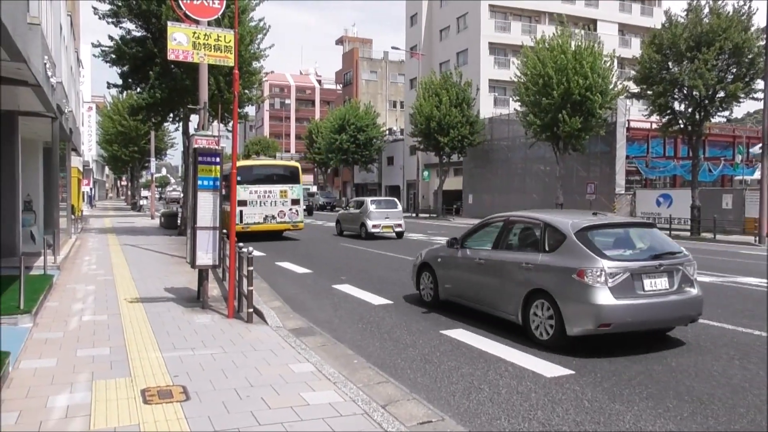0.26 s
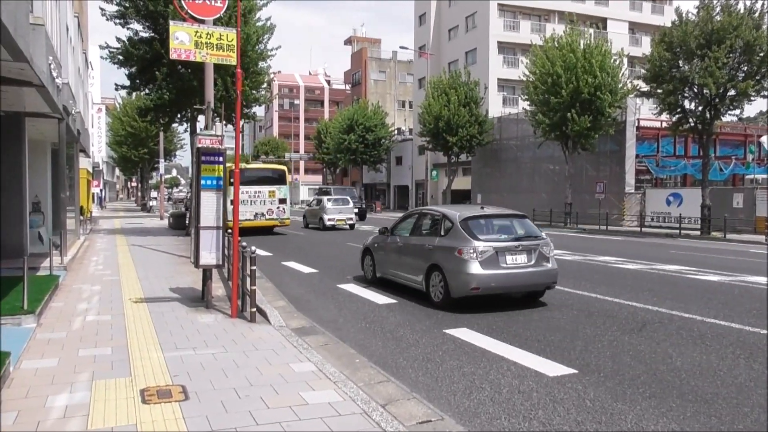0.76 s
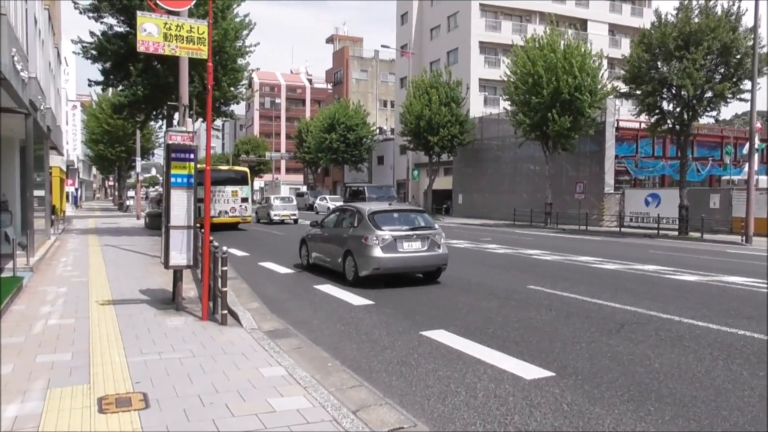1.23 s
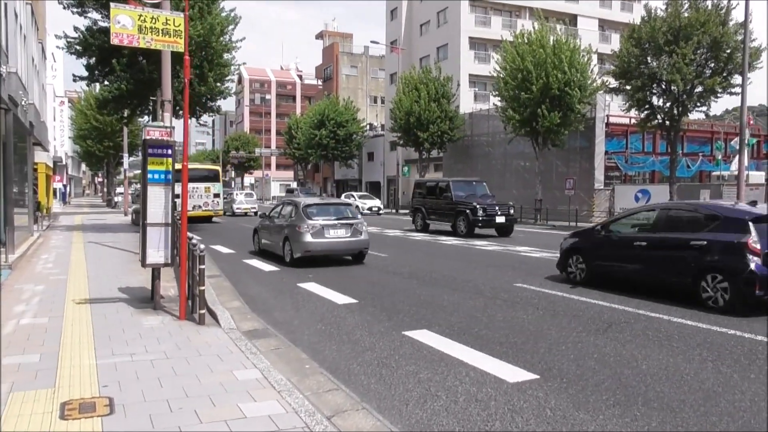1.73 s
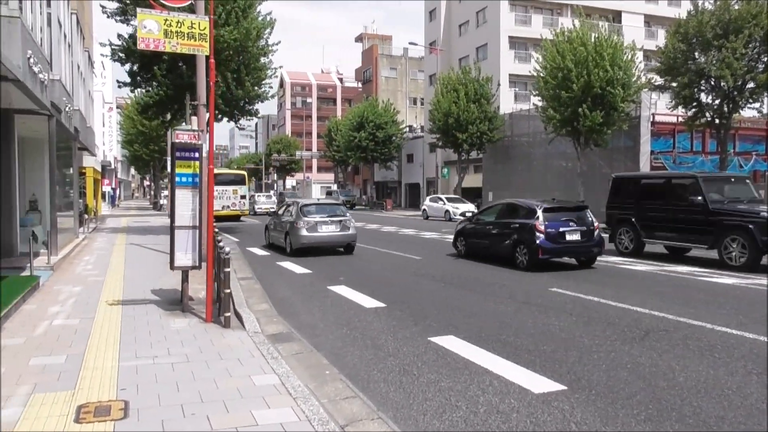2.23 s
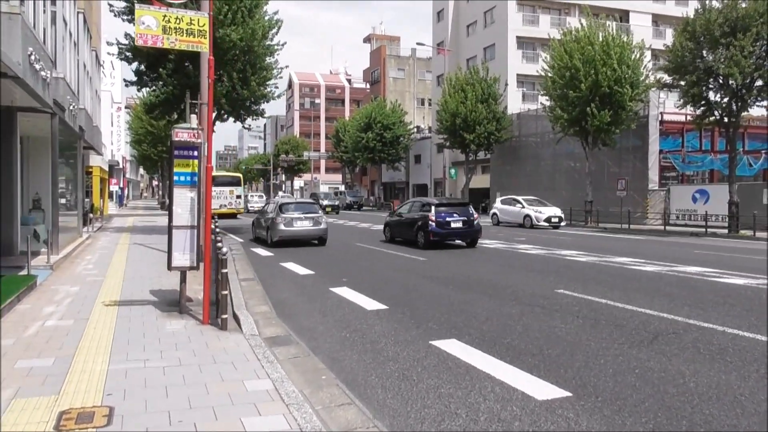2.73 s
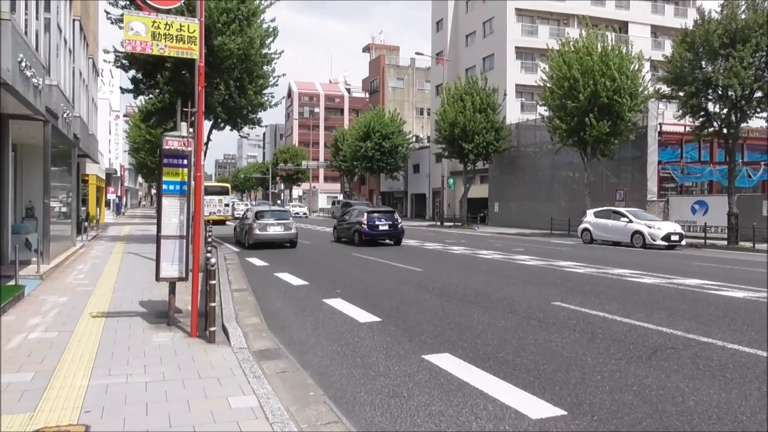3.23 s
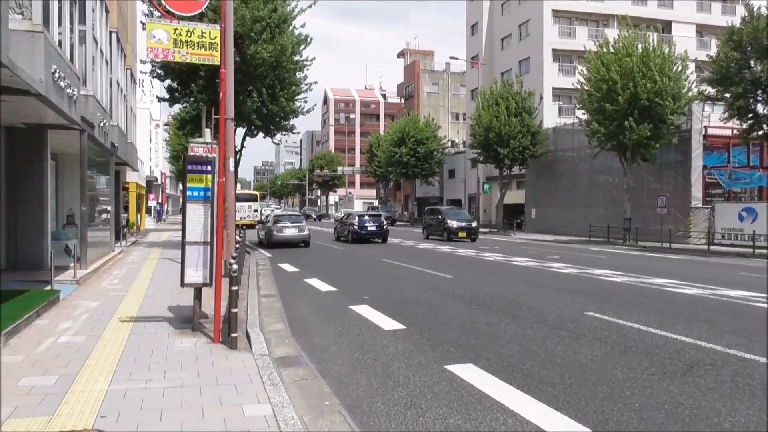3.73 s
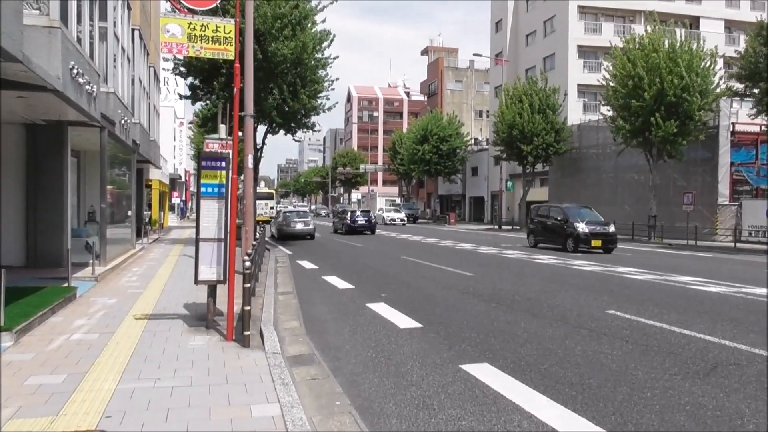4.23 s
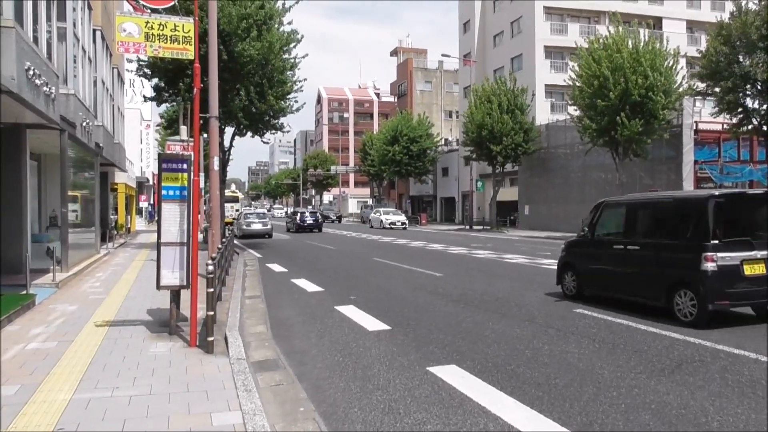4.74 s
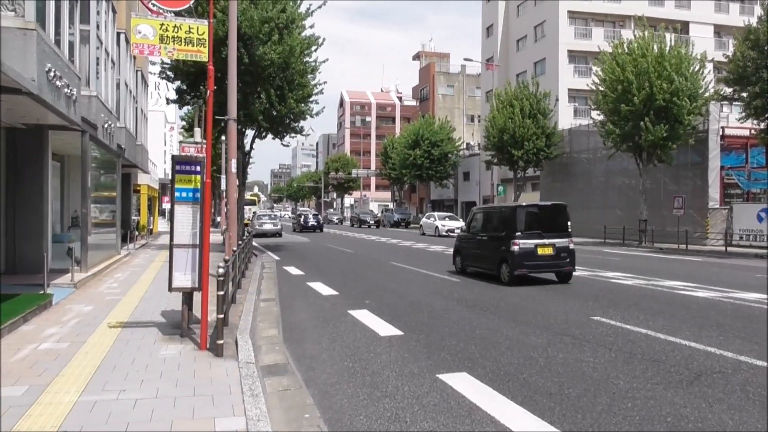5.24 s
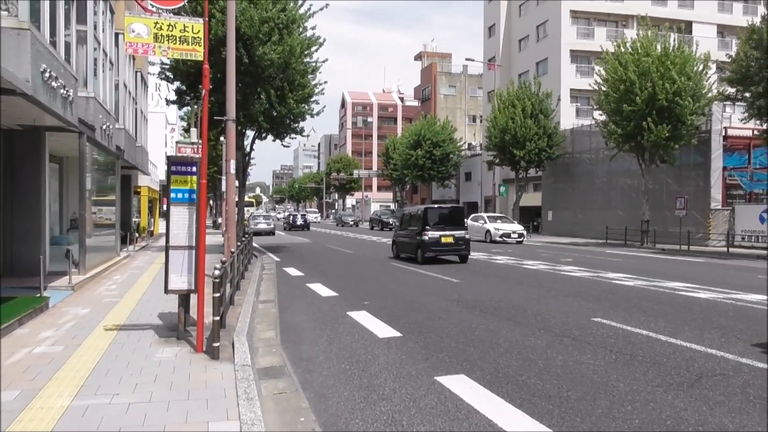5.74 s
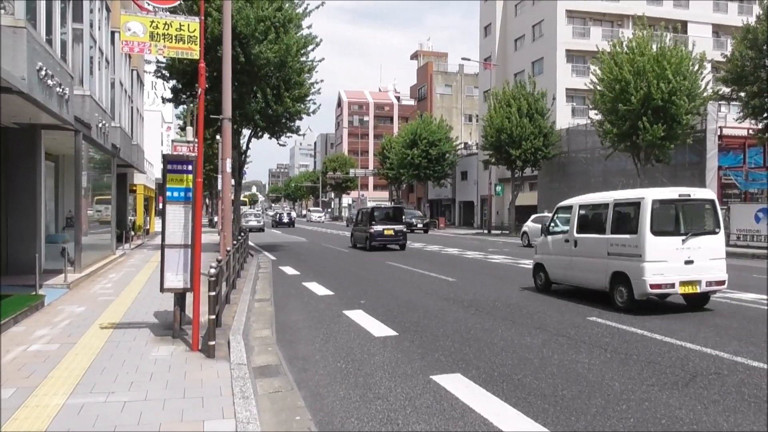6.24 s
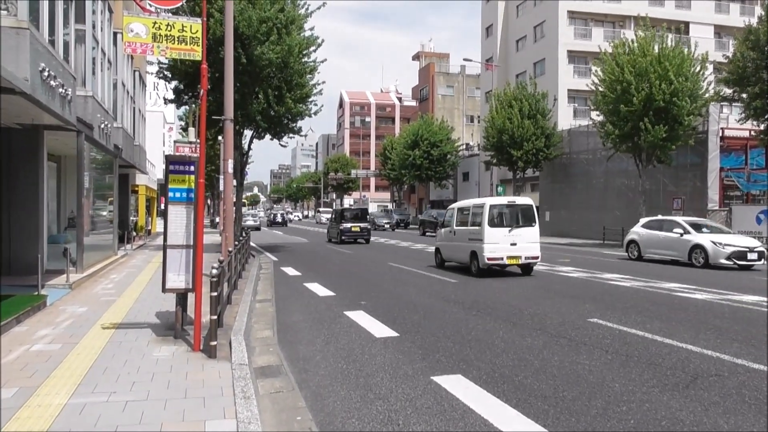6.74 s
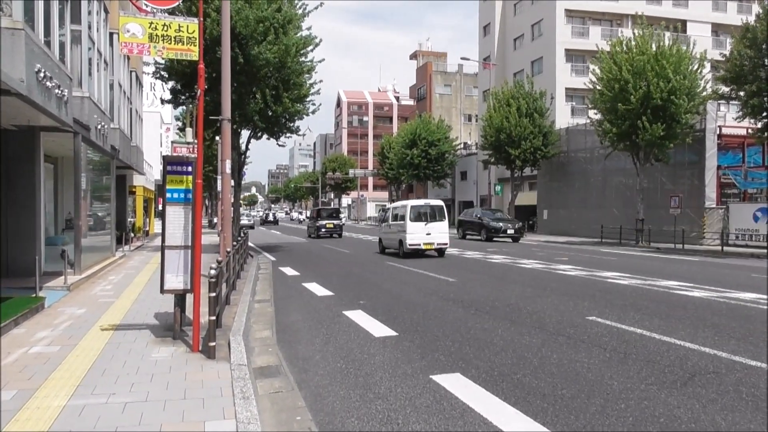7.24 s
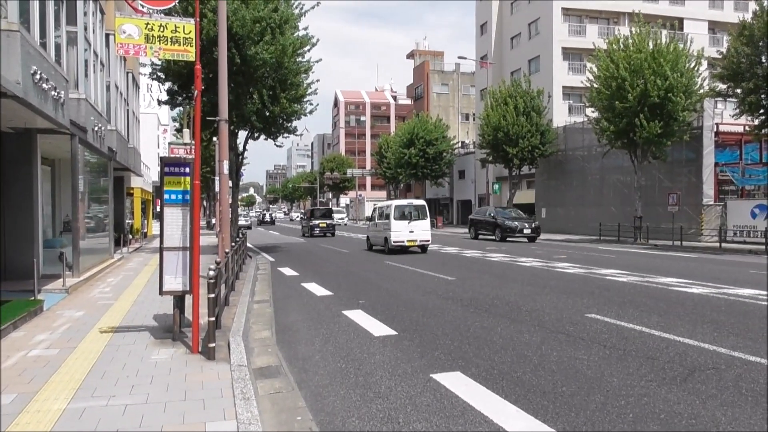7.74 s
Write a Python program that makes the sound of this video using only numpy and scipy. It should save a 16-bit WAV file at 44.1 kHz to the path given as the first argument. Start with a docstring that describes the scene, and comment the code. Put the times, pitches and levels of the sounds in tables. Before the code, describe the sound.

Steady city traffic rumbles as a bus engine pulls hard, shifts and pulls again, with passing tyre noise, small sharp ticks and an abrupt stop.

```python
"""On the pavement of a wide city street, a diesel bus pulls away from a stop.
Uneven firing pulses thud in its exhaust and chop the engine roar; the engine bay resonates as noise bands.
The turbocharger is a gliding whistle in a noisy halo. Cars and vans are swelling tyre noise and fine hiss,
among booms and breathy tones from narrow noise bands, over a rumble of shaped noise.
A few sharp ticks are short noise bursts; then the sound cuts off."""
import sys
import numpy as np
from scipy import signal
from scipy.fft import rfft, irfft
from scipy.io import wavfile
from scipy.ndimage import uniform_filter1d, minimum_filter1d

SR = 44100
rng = np.random.default_rng(int(sys.argv[2]) if len(sys.argv) > 2 else 0)


def inscribe(sig):
    """Save sig as 16-bit PCM at rate SR to the path in sys.argv[1].

    A 1-D sig is mono; a 2-D sig holds one channel per row.
    Samples are clipped to [-1, 1] before scaling.
    """
    pcm = np.round(np.clip(np.atleast_2d(sig).T, -1, 1) * 32767)
    wavfile.write(sys.argv[1], SR, pcm.astype(np.int16))


N = 351918
T = np.arange(N) / SR  # time of each sample, s
HZ = np.fft.rfftfreq(N, 1 / SR)  # frequency of each spectrum bin

# vehicles rolling by: peak_s, half_length_s, tread_db, groove_hz, rush_of_air_db, hiss_db,
# left_right_db (the tyres take only a share of it), hiss_brightness_db_per_octave
VEHICLES = [(0.15, 0.68, -25, 907, -30, -44, -1, 7.5), (1.103, 0.6, -25, 923, -33, -50.5, 3.5, 17),
            (1.85, 0.24, -27.5, 1102, -32.5, -47.5, 3.5, 7), (2.552, 0.74, -26, 1152, -30, -47, 0, -2),
            (4.021, 0.33, -24.5, 1195, -39, -58.5, -2.5, 0.5),
            (4.598, 0.4, -22, 1222, -33, -51.5, -1.5, 5.5),
            (5.085, 0.24, -23, 1294, -36.5, -54.5, -9.5, -11), (5.6, 0.56, -24, 1279, -32, -42, -9.5, -21),
            (6.142, 0.51, -23.5, 1410, -41.5, -38.5, -0.5, -3), (7.022, 0.67, -22.5, 947, -54, -46, 0, 4)]
# shape of the low rumble of traffic and exhaust: frequency_hz, relative_level_db
RUMBLE_SHAPE = [(15, -40.5), (25, -23.5), (42, -14), (70, -5.5), (105, -3.5), (160, 0), (225, 0),
                (295, 0.5), (380, -7.5), (600, -16), (1500, -63.5)]


def diesel(uneven=0.37, trim_db=-1.5, pulse_width=0.15):
    """Firing pulses, three to a crank turn and unequal, thud in the exhaust and chop the engine roar."""
    # firing of the bus engine: time_s, firings_per_s, exhaust_level_db
    firing = [(0, 93, -26.5), (1.2, 99, -37.5), (2.2, 94, -29.5), (3.2, 103, -26.5), (3.6, 92, -30.5),
              (4.3, 93, -26), (5.5, 95, -38.5), (7.4, 108, -31.5)]
    # the bus pulls, changes gear and pulls again: time_s, roar_level_db (before the trim)
    engine_load = [(0, -16), (0.8, -16), (1.8, -17.5), (3.25, -16), (3.5, -17.5), (3.7, -15.5), (4.62, -14),
                   (4.95, -16), (7.4, -15)]
    # shape of the engine roar: frequency_hz, relative_level_db
    roar_shape = [(200, -18.5), (330, -4.5), (420, -4.5), (560, -1), (740, 0), (860, -2), (1050, -19.5),
                  (1800, -16), (4000, -68)]

    rate, exhaust_db = curves(firing)
    load_db, = curves(engine_load)
    firings = np.cumsum(rate * (1 + 0.00834 * wander(5.93))) / SR  # count so far; the rate strays a little
    pulses = np.exp(-((firings % 1 - .5) / pulse_width) ** 2)
    # every third pulse is stronger than the other two
    pulses = pulses * (1 + 2 * uneven * np.cos(2 * np.pi * np.floor(firings) / 3))
    exhaust = street(colour(RUMBLE_SHAPE), pulses - pulses.mean()) * gain_of(exhaust_db)
    # shallow, because echoes from the house fronts fill in most of the chop
    chop = 1 - .14 * np.cos(2 * np.pi * firings)
    roar = street(colour(roar_shape)) * chop * gain_of(load_db + trim_db)
    return exhaust + roar


def engine_bay(side_db=1.5, growl_db=0.45):
    """Hollow resonances build up unevenly as the bus pulls hard and fall away at the gear change."""
    # resonances of the engine bay: pitch_hz, width_hz, level_db (at full pull)
    bay_resonances = [(447.7, 77, -23.5), (602, 70, -23), (701.5, 70, -23), (783, 60, -23.5)]
    full_pull_s, build_db_per_s = 1.76, 11.5
    shift_s, release_db_per_s = 3.31, 71

    build_db = -build_db_per_s * np.maximum(full_pull_s - T, 0)
    release_db = -release_db_per_s * np.maximum(T - shift_s, 0)
    ringing = both_sides(sum(hollow(hz, width) * gain_of(db) for hz, width, db in bay_resonances))
    return ringing * gain_of(build_db + release_db + growl_db * wander(12)) * panned(side_db)


def turbo(core_db=-5.0, halo_db=-1.5, flicker_db=1.5, halo_width_hz=100):
    """The blade tone follows the boost; turbulence and reflections smear a halo around it."""
    # strength of the whistle: time_s, level_db
    whistle = [(0.95, -67), (1.13, -55), (1.22, -41.5), (1.3, -47.5), (1.42, -46.5), (1.55, -53),
               (1.68, -49.5), (1.73, -46.5), (1.87, -47), (2.1, -44), (2.36, -44), (2.42, -50),
               (2.75, -52.5), (2.97, -58.5), (3.03, -43), (3.08, -54), (3.22, -69.5)]
    # the pitch is one arch: it spools up, tops out and runs down
    top_s, top_hz = 2.47, 8670
    spool_hz_per_s2, run_down_hz_per_s2 = 1070, 2050

    level_db, = curves(whistle)
    bend = np.where(T < top_s, spool_hz_per_s2, run_down_hz_per_s2)
    hz = np.maximum(top_hz - bend * (T - top_s) ** 2, top_hz / 2)
    shaky_hz = hz + 18 * wander(30)
    tone = np.exp(2j * np.pi * np.cumsum(shaky_hz) / SR)
    halo = tone * (wander(halo_width_hz) + 1j * wander(halo_width_hz))
    mixed = evened(tone.real) * gain_of(core_db) + evened(halo.real) * gain_of(halo_db)
    return mixed * gain_of(level_db + flicker_db * wander(12))


def tyres(patchy_db=.5, side_share=.35, far_side_db=0.0):
    """Treads drum on asphalt, grooves sing, air is squeezed out; the grain of the road shakes all three."""
    # shape of the tread roar: frequency_hz, relative_level_db
    tread_shape = [(400, -19), (750, -15), (950, 1.5), (1250, -1.5), (1600, -8.5), (2050, -16.5),
                   (2800, -32.5), (6000, -63.5)]
    # shape of the rush of air: frequency_hz, relative_level_db
    rush_shape = [(1000, -6), (1900, 1.5), (2550, 1), (3400, -3.5), (4200, -8.5), (4900, -16.5),
                  (6300, -20), (7700, -18.5), (9500, -24.5), (12000, -39), (15500, -54)]
    far_tread_db, far_rush_db = -24.5, -32.5  # steady tyres further down the street
    groove_db, groove_width_hz = -1.5, 150  # groove level is relative to the tread roar

    # add powers, so that all vehicles can share one noise for each kind of sound
    tread_power = (gain_of(far_tread_db) * panned(far_side_db)) ** 2
    rush_power = (gain_of(far_rush_db) * panned(far_side_db)) ** 2
    grooves = 0
    for s, half_s, tread_db, groove_hz, rush_db, _, side_db, _ in VEHICLES:
        nearness = swell(s, half_s)
        near = nearness * panned(side_share * side_db)
        tread_power = tread_power + (near * gain_of(tread_db)) ** 2
        rush_power = rush_power + (near * gain_of(rush_db)) ** 2
        song = hollow(groove_hz, groove_width_hz)
        grooves = grooves + song * nearness * gain_of(tread_db + groove_db)
    tread = street(colour(tread_shape)) * np.sqrt(tread_power)
    rush = street(colour(rush_shape)) * np.sqrt(rush_power)
    return (tread + both_sides(grooves) + rush) * gain_of(patchy_db * wander(23))


def passing(flutter_db=0.84):
    """Fine hiss carries only from vehicles close by, each with its own brightness."""
    # shape of the hiss before each vehicle's tilt: frequency_hz, relative_level_db
    hiss_shape = [(3000, -16), (4500, -11.5), (5400, -12.5), (6500, -4), (7400, 3.5), (8600, 1.5),
                  (9800, -4), (11500, -11.5), (13500, -26), (15500, -37.5)]

    octaves = np.log2(np.maximum(HZ, 4000) / 8000)  # above or below 8 kHz
    hiss = 0
    for s, half_s, _, _, _, db, side_db, tilt in VEHICLES:
        noise = street(colour(hiss_shape) * gain_of(tilt * octaves))
        hiss = hiss + noise * swell(s, half_s) * gain_of(db) * panned(side_db)
    return hiss * gain_of(flutter_db * wander(22))


def spray(s=5.7, half_s=0.62, flutter_db=2.2, doppler_hz_per_s=-60):
    """As two vans go by, air squeezed from their treads rings in fluttering bands that sink in pitch."""
    # broad bands in the vans' tyre noise: pitch_hz (at the peak of the pass), width_hz, level_db
    tyre_bands = [(3410, 250, -43.5), (4150, 200, -47), (5400, 300, -50.5)]

    sink_hz = doppler_hz_per_s * (T - s)
    bands = sum(hollow(hz + sink_hz, width) * gain_of(db + flutter_db * wander(9))
                for hz, width, db in tyre_bands)
    return both_sides(bands) * swell(s, half_s)


def rings():
    """Breathy tones, most of them narrow, come and go in the traffic, some steady, some gliding in pitch."""
    # drones, whines and whooshes, as from engines, gears and tyres:
    # peak_s, half_length_s, pitch_hz (at the peak), drift_hz_per_s, width_hz, level_db
    traffic_tones = [(0.2, 0.48, 952, -0.5, 10, -28), (0.6, 0.76, 2590, -1, 50, -42.5),
                     (1.2, .17, 2600, -1, 50, -37.5), (1.22, .16, 3510, -200, 600, -42),
                     (1.66, 0.13, 679, -3.5, 25, -23), (2.25, .4, 693, -105, 35, -26),
                     (2.597, 0.5, 204.2, 12.5, 11, -27), (2.8, .3, 3060, 0, 150, -40),
                     (3.237, 0.096, 609, -0.5, 19, -19), (4.298, 0.35, 1229, 35.5, 11, -28.5),
                     (5.15, .25, 214.7, -15.5, 6, -29), (5.598, 0.38, 1265, 0, 13, -31.5),
                     (6.898, 0.61, 741, -0.5, 20, -28), (7.198, .25, 229.4, 0, 5.4, -25),
                     (7.33, 0.13, 2543, -1.5, 45, -39.5)]

    tones = 0
    for s, half_s, hz, drift, width, db in traffic_tones:
        moving_hz = hz + drift * np.clip(T - s, -2 * half_s, 2 * half_s)
        tones = tones + hollow(moving_hz, width) * swell(s, half_s) * gain_of(db)
    return both_sides(tones)


def ticks(rise_s=0.00024):
    """Short snaps of noise, bright or dull, rise almost at once and quickly die away."""
    # sharp small ticks: start_s, level_db, time_to_fall_60_db_s, dullness (0-1)
    snaps = [(1.7058, -29, 0.008, 0), (1.7082, -28, 0.018, 0), (1.719, -36, .11, 0), (1.93, -38, .06, 0),
             (2.08, -31, 0.027, 0.3), (2.702, -34, 0.03, 0.1), (3.435, -39, .03, 0), (7.21, -31, .03, .75),
             (7.2945, -22.5, 0.015, .75), (7.301, -33, .025, 0.1), (7.305, -13, 0.0105, 0.23),
             (7.3195, -33.5, .015, 0.5), (7.3453, -24.5, 0.018, 0.66)]
    # shape of the bright snaps: frequency_hz, relative_level_db
    bright_shape = [(2500, -24), (4100, -17.5), (4550, -7), (5600, -12.5), (6800, -3.5), (7900, 0),
                    (9500, -6.5), (11000, -14), (15500, -20.5)]
    # shape of the dull snaps: frequency_hz, relative_level_db
    dull_shape = [(1200, -11), (2600, 1), (4200, -1.5), (6500, -8.5), (9000, -22), (15500, -41.5)]

    bright, dull = np.zeros((2, N))
    for s, db, t60, dullness in snaps:
        age = np.maximum(T - s, 0)
        rise = 1 - np.exp(-age / rise_s)
        envelope = gain_of(db - 60 * np.minimum(age / t60, 2)) * rise
        share = np.clip(dullness, 0, 1)
        bright = bright + envelope * (1 - share)
        dull = dull + envelope * share
    return street(colour(bright_shape)) * bright + street(colour(dull_shape)) * dull


def traffic(level_db=-17.5, throb_db=.5):
    """Many engines blend into one uneven rumble between the buildings, with booms now and then."""
    # hollow booms, as from exhausts: peak_s, half_length_s, pitch_hz, level_db
    exhaust_booms = [(1.05, 0.76, 268.2, -22.5), (2.826, 0.095, 262.5, -16), (4.45, 0.35, 155.6, -22.5),
                     (4.4, .25, 269.7, -22.5), (5.4, 0.42, 315, -26), (6.448, 0.25, 286.4, -23),
                     (6.602, 0.18, 175.6, -24), (7.15, 0.43, 232.3, -19)]
    boom_width = 0.23  # share of the pitch
    lull_s, lull_half_s, lull_db = 3.65, .3, -1.5  # the rumble thins between two groups of cars

    lull = lull_db * swell(lull_s, lull_half_s)
    rumble = street(colour(RUMBLE_SHAPE)) * gain_of(level_db + lull + throb_db * wander(3.3))
    booms = sum(hollow(hz, hz * boom_width) * swell(s, half_s) * gain_of(db)
                for s, half_s, hz, db in exhaust_booms)
    return rumble + both_sides(booms)


def street(shape, drive=None):
    """A coloured drive (noise if none) plus diffuse noise on both sides, at rms 1."""
    direct, diffuse = rng.standard_normal((2, N))
    if drive is not None:
        direct = evened(drive)
    pair = both_sides([direct, diffuse], shape)
    return pair / np.sqrt(np.mean(pair.mean(0) ** 2))  # rms of the two sides' average


def both_sides(pair, shape=1):
    """Colours a direct and a diffuse sound (from the house fronts) and spreads them left and right."""
    # how the two sides relate: frequency_hz, likeness (0-1), left_right_db, lead_of_left_radians
    stereo_spread = [(30, .2, 0, 0), (60, 0.5, 3.5, 0.28), (130, 1, 3.5, -0.46), (298.5, 1, 3.5, -0.48),
                     (640, 1, 1.3, -0.69), (1207, 0.77, -0.5, -0.68), (2190, 0.75, 0, -0.41),
                     (4490, 0.89, 0.5, 0.14), (7960, 1, 0, -0.58), (10970, 0.05, -0.5, 0),
                     (15000, .05, 0.5, 0)]

    same, side_db, lead = spectra(stereo_spread)
    same = np.clip(same, 0, 1)
    weights = np.sqrt([(1 + same) / 2, (1 - same) / 2])
    direct, diffuse = rfft(np.float32(pair)) * (shape * weights)
    left = gain_of(side_db / 2) * np.exp(.5j * lead)
    # the diffuse part has opposite signs left and right, which makes the sides differ
    return irfft(np.complex64([(direct + diffuse) * left, (direct - diffuse) / left]), N)


def hollow(hz, width_hz):
    """Noise in one resonance whose pitch may move: a direct and a diffuse part."""
    slow = T[::18]  # the slow sway needs only every 18th sample
    offset_hz = np.fft.fftfreq(len(slow), slow[1])
    a, b = rng.standard_normal((2, 2, len(slow)))
    sway = np.fft.ifft((a + 1j * b) / (1 + (offset_hz / width_hz) ** 2))
    turns = np.cumsum(hz / SR * np.ones(N))
    angle = np.float32(2 * np.pi * (turns - np.floor(turns)))
    cos, sin = np.cos(angle), np.sin(angle)
    # the slow sway carried up to the pitch
    parts = [cos * np.interp(T, slow, part.real) - sin * np.interp(T, slow, part.imag) for part in sway]
    return evened(np.array(parts))


def swell(s, half_s):
    """Gain of a beaming source that comes near and goes away."""
    return 1 / (1 + ((T - s) / half_s) ** 2 / 2) ** 2


def panned(side_db):
    """Gains of the left and right side, side_db apart."""
    return gain_of(np.array([[side_db], [-side_db]]) / 2)


def wander(rate_hz):
    """Slow random movement of rms 1: noise with the parts faster than rate_hz faded out."""
    return evened(irfft(rfft(rng.standard_normal(N)) / (1 + (HZ / rate_hz) ** 4), N))


def colour(rows):
    """A spectrum table as gain per bin."""
    return gain_of(spectra(rows)[0])


def spectra(rows):
    """Each column of a frequency table, bin by bin on a logarithmic frequency scale."""
    f, *columns = np.transpose(rows)
    log_hz = np.log(HZ + 1)
    return [np.interp(log_hz, np.log(f + 1), c) for c in columns]


def curves(rows):
    """Each column of a timed table, sample by sample."""
    s, *columns = np.transpose(rows)
    return [np.interp(T, s, c) for c in columns]


def evened(x):
    """Scales to rms 1."""
    return x / np.sqrt(np.mean(x ** 2) + 1e-20)


def gain_of(db):
    """Decibels to gain."""
    return np.exp(np.asarray(db) * (np.log(10) / 20))


def scene():
    """The street at the bus stop: a near vehicle briefly screens the bus engine and the traffic."""
    # moments of screening: deepest_s, level_db
    screening = [(2.1, -1), (4.72, -3)]
    cover_s, uncover_s = .025, 0.084  # half lengths of the dip before and after its deepest point

    dip_db = sum(db * swell(s, np.where(T < s, cover_s, uncover_s)) for s, db in screening)
    screened = (diesel() + engine_bay() + tyres() + rings() + traffic()) * gain_of(dip_db)
    return screened + turbo() + passing() + spray() + ticks()


def record(dry, ceiling_db=0.0):
    """A quick limiter holds the peaks under full scale; then the abrupt stop and the band limit."""
    stop_s, edge_hz = 7.425, 15700
    room = np.minimum(1, gain_of(ceiling_db) / (abs(dry).max(0) + 1e-9))
    # the gain dips around each peak, smoothed over 257 samples
    limited = dry * uniform_filter1d(minimum_filter1d(room, size=257), size=257)
    stopped = limited * np.clip((stop_s - T) / .002, 0, 1)  # 2 ms fade
    low_pass = signal.firwin(511, edge_hz, window=("kaiser", 9), fs=SR)
    return signal.oaconvolve(stopped, low_pass[None], "same")


dry = scene()
out = record(dry)
inscribe(out)
```